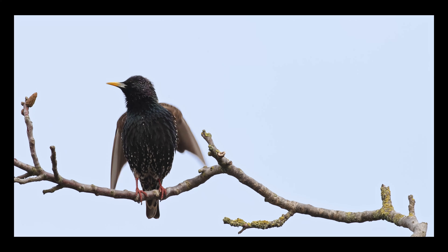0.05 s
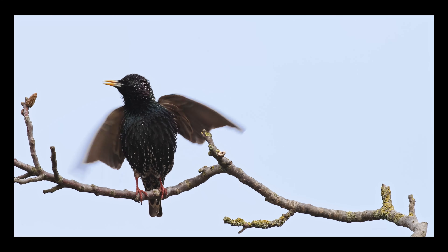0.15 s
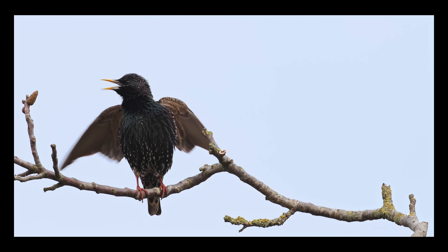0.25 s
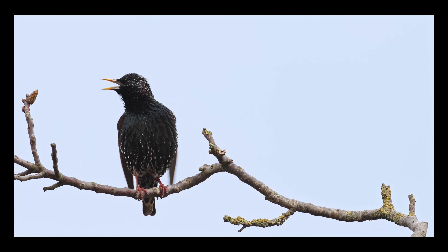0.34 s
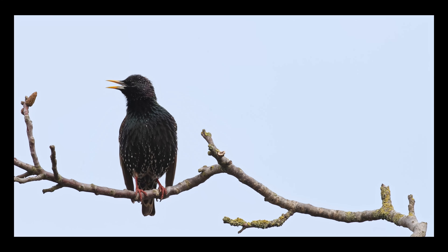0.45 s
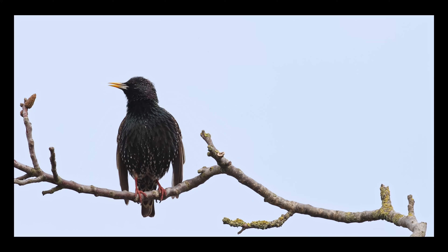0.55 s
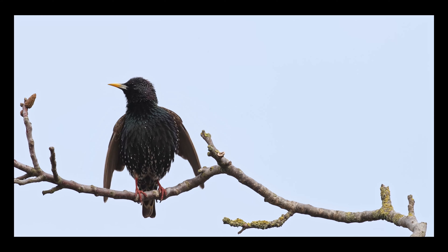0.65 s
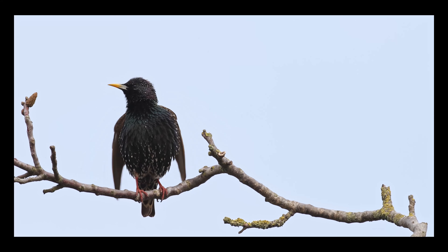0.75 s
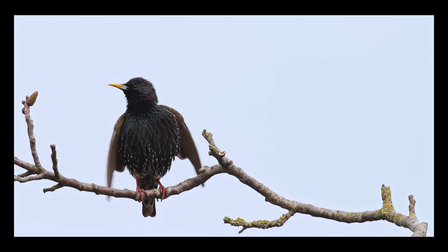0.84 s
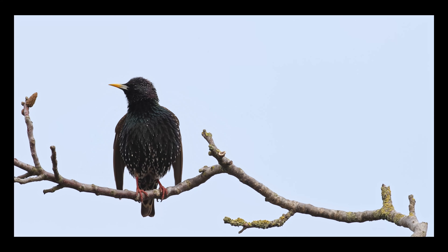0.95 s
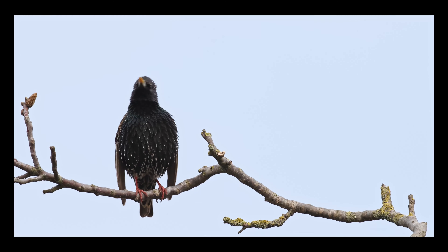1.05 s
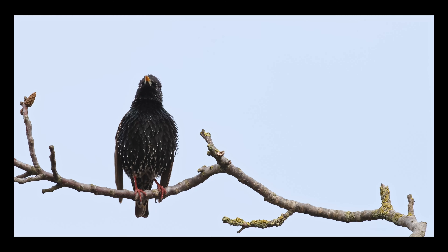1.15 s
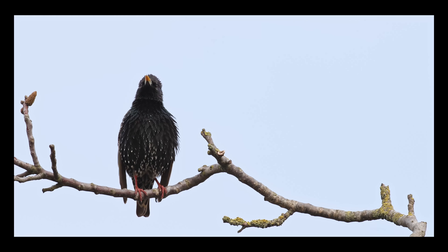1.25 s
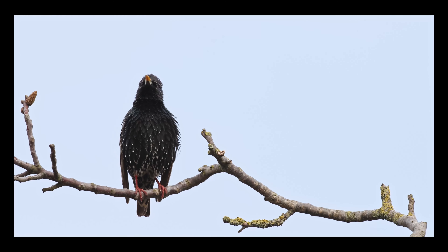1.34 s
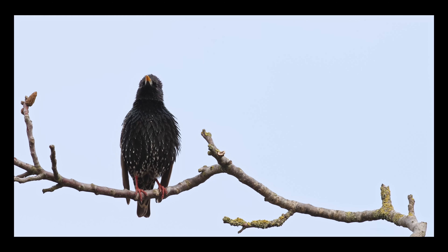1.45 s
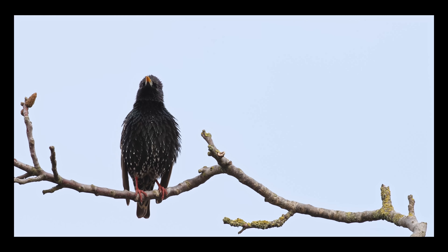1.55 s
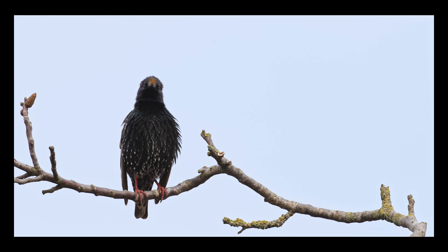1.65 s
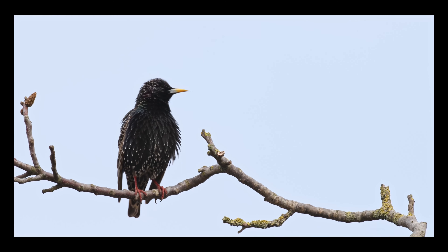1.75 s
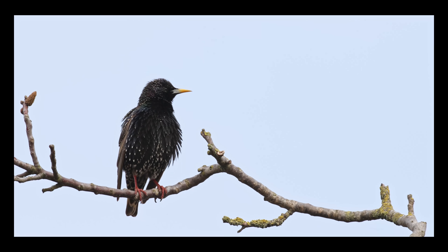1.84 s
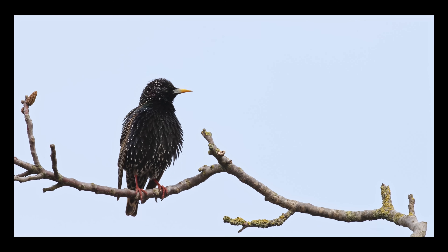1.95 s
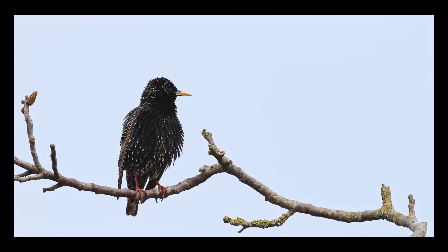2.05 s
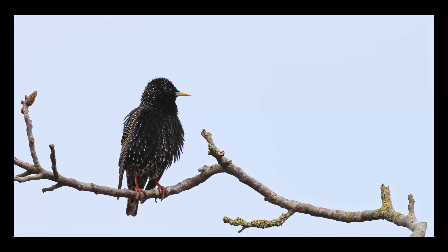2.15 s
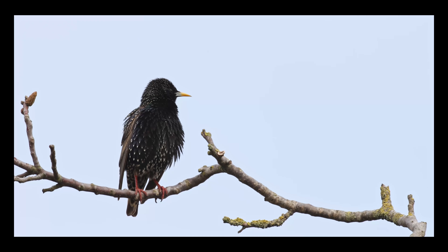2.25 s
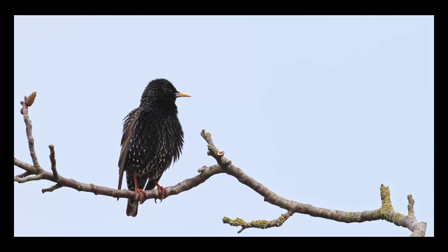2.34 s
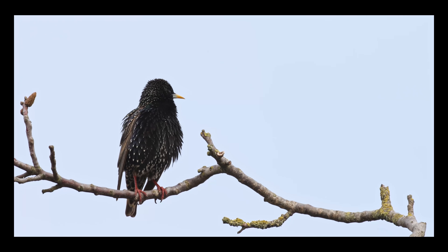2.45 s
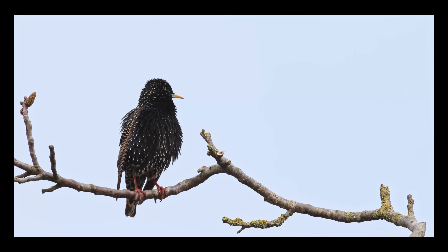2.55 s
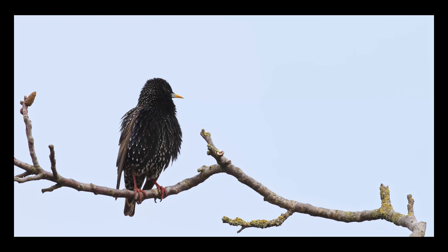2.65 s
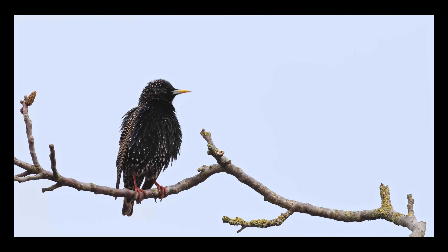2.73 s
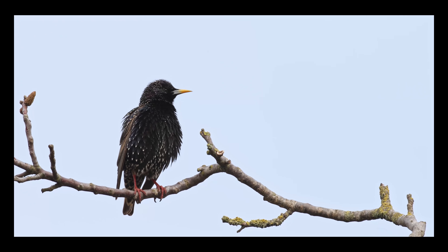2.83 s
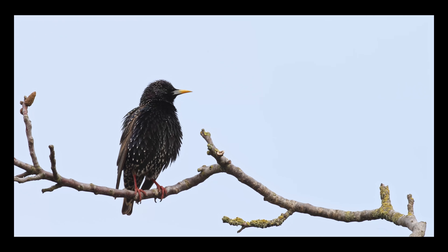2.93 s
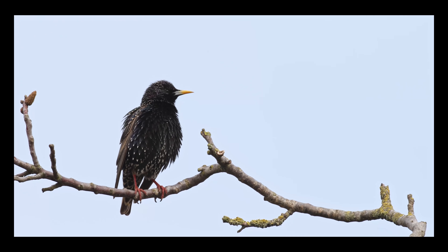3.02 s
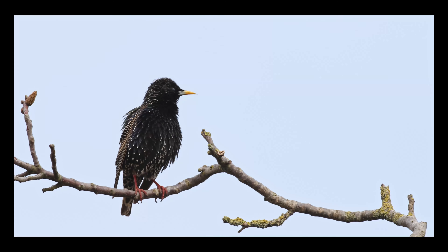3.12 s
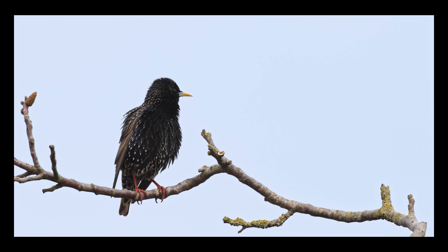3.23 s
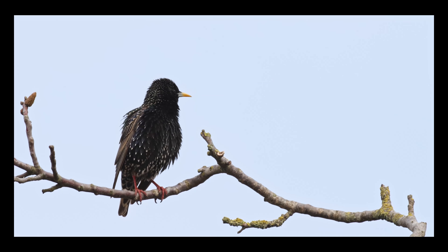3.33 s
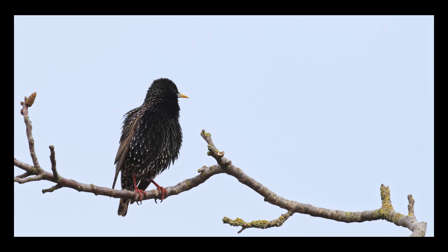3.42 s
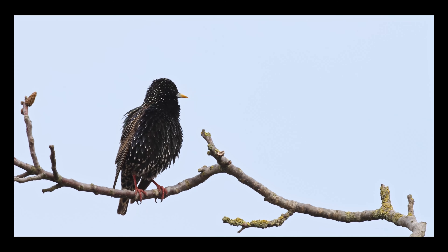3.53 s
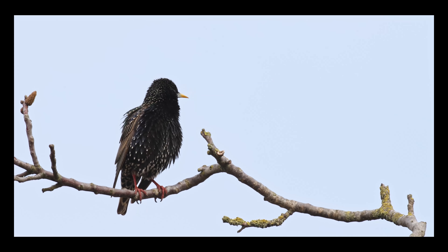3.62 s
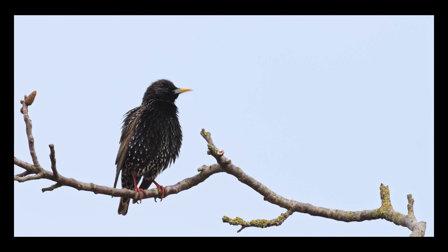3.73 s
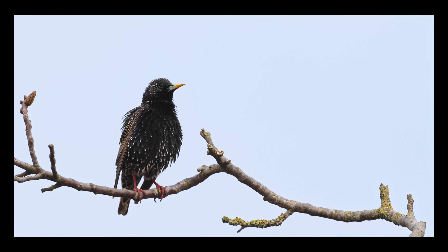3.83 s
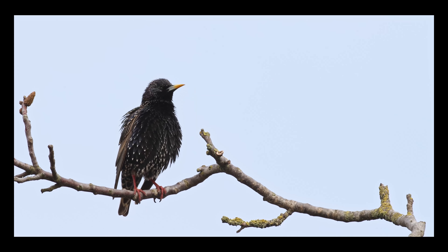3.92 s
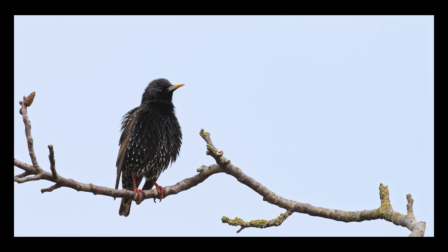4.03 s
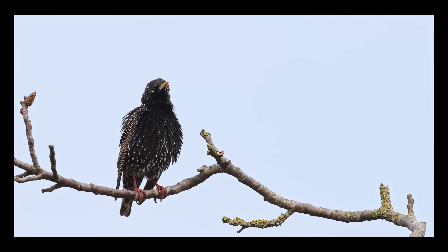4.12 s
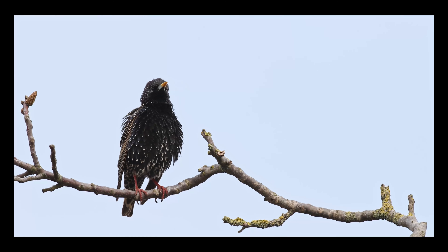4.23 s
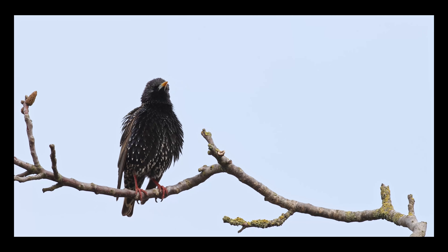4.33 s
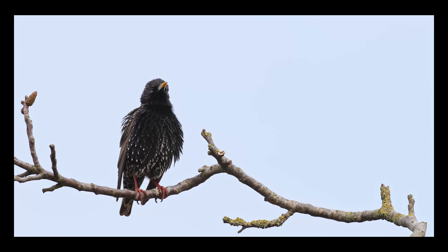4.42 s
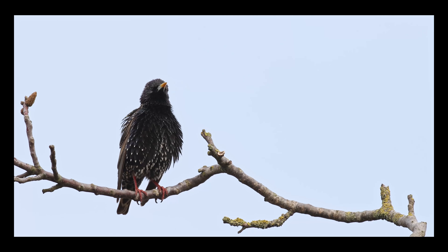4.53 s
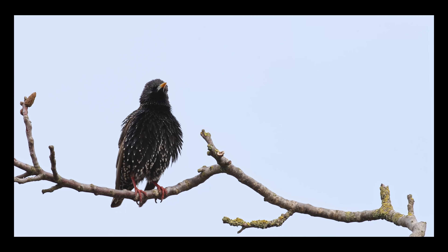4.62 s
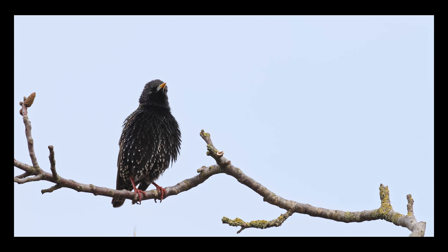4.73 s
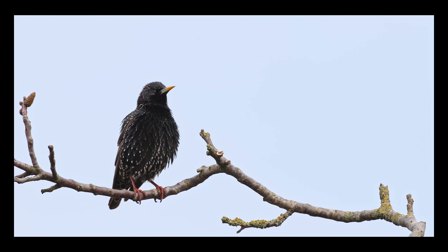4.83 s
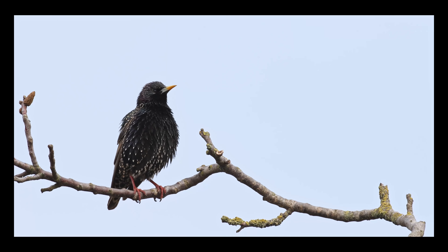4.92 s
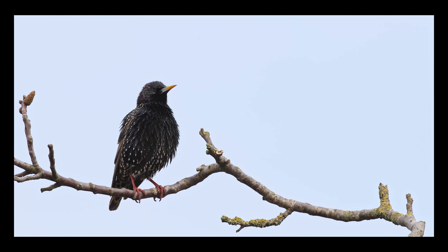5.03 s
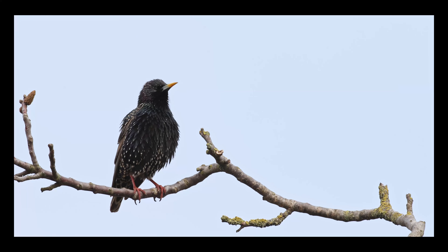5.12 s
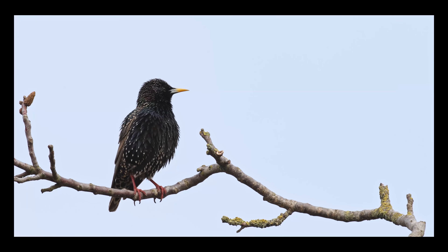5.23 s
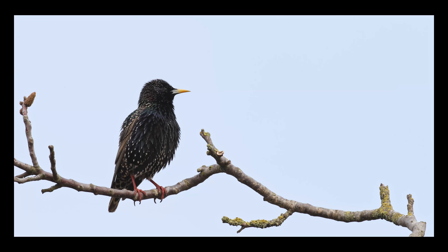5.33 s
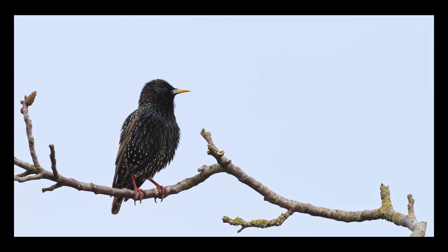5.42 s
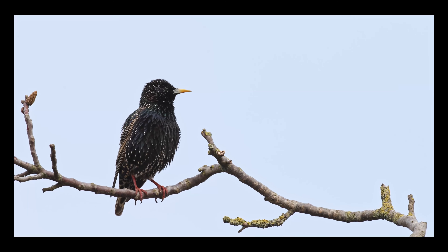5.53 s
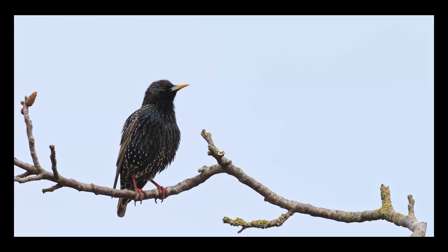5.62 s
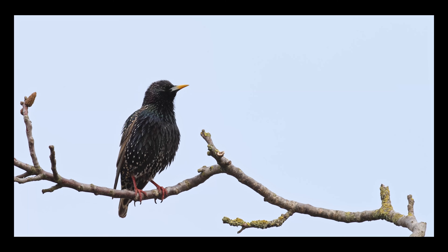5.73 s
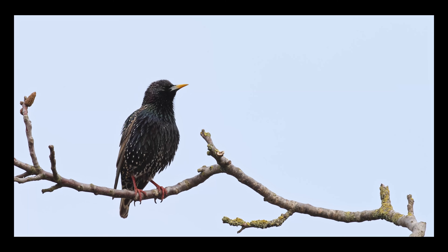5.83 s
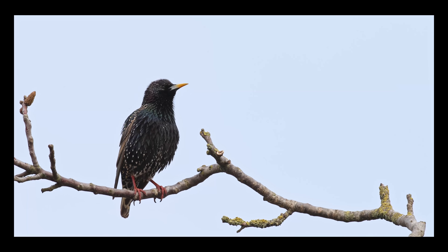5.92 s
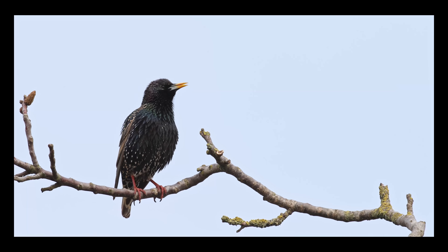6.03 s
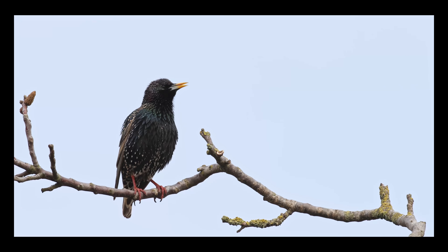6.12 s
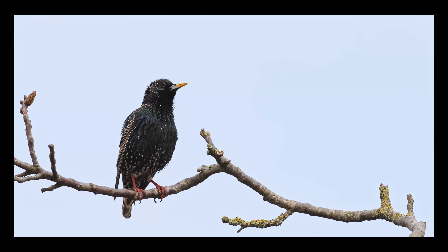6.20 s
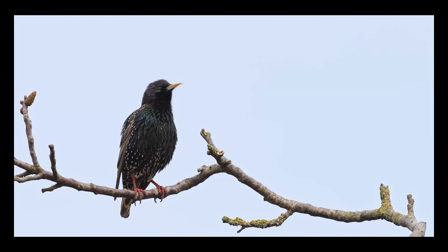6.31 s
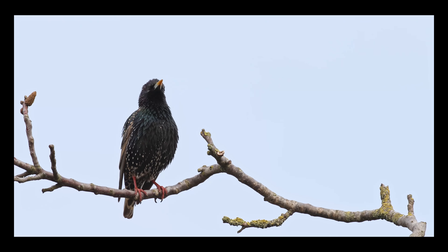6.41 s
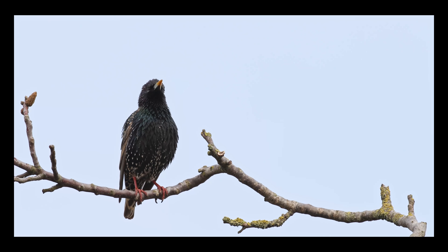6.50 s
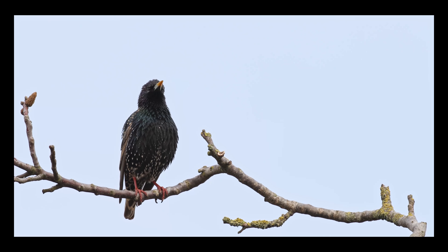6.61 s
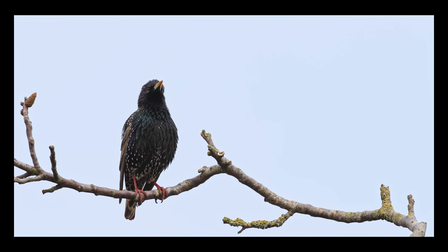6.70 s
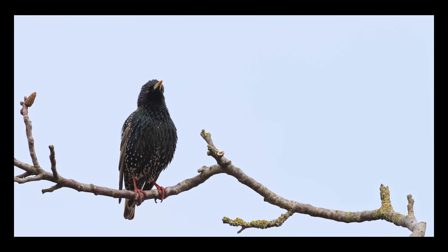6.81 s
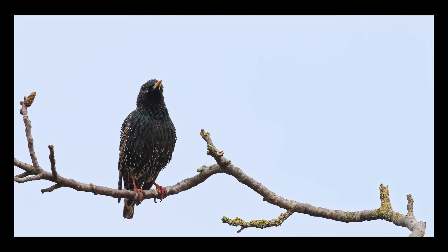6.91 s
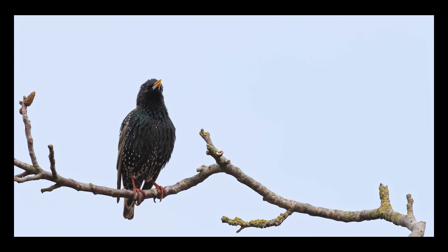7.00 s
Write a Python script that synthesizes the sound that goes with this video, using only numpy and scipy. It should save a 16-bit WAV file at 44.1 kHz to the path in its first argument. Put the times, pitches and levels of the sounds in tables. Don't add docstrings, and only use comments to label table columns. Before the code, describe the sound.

A starling close by on a bare branch opens with a quick rattle and buzz, then repeats shrill, rapidly fluttering high notes with short falling glides between them, weakening by three seconds. A few dry knocks tick near the microphone. Afterwards farther songbirds whistle and chip with a soft outdoor echo, while a thin whistle slides down. Low town rumble, light hiss and a wind puff lie underneath.

```python
import sys
import numpy as np
from scipy import signal
from scipy.fft import rfft, irfft, next_fast_len
from scipy.io import wavfile
from scipy.ndimage import uniform_filter1d, map_coordinates

SR = 44100
rng = np.random.default_rng(int(sys.argv[2]) if len(sys.argv) > 2 else 0)


def generate_wav(signal):
    frames = np.transpose(np.atleast_2d(signal))
    scaled = np.clip(frames, -1, 1) * 32767
    pcm = np.round(scaled).astype(np.int16)
    wavfile.write(sys.argv[1], SR, pcm)


def gain_from_decibels(decibels):
    exponent = np.asarray(decibels, float) / 20
    return 10 ** exponent


N = 311346
TIME = np.arange(N) / SR


def unit(x):
    return x / np.sqrt(np.mean(x ** 2) + 1e-20)


def along(points, hz):
    f, v = np.transpose(points)
    return np.interp(np.log(hz + 1), np.log(f + 1), v)


def wobble(t, rate):
    return map_coordinates(rng.standard_normal(int(rate) + 8), [(t - t[0]) * rate], mode="wrap")


def filtered(x, response):
    m = next_fast_len(N + SR // 2)
    return irfft(rfft(x, m) * response(np.fft.rfftfreq(m, 1 / SR)), m)[..., :N]


def span(rows):
    s, *cols = np.transpose(rows)
    t = TIME[round(s[0] * SR):round(s[-1] * SR)]
    return t, [uniform_filter1d(np.interp(t, s, c), size=150, mode="nearest") for c in cols]


def add(out, t, hz, db, overtones_db, unsteady_db=5.5, rate=90):
    phase = 2 * np.pi * np.cumsum(hz) / SR
    tone = np.sin(phase)
    for k, over_db in enumerate(overtones_db):
        tone = tone + gain_from_decibels(over_db) * np.sin((k + 2) * phase)
    edge = np.clip(np.minimum(t - t[0], t[-1] - t) / 0.00078, 0, 1)
    strength = np.sqrt(2) * gain_from_decibels(db + unsteady_db * np.clip(wobble(t, rate), -3, 1.3))
    out[round(t[0] * SR):][:len(t)] += strength * edge * tone


def dips(first_s, last_s, depth_hz):
    gap_s, last_early_s = 0.0285, 0.008
    opening_shares, closing_shares = (0.247, 0.653), (0.467, 0.63)
    count = round((last_s + last_early_s - first_s) / gap_s) + 1
    times = np.minimum(np.linspace(first_s, last_s + last_early_s, count), last_s)
    depths = depth_hz * np.r_[opening_shares, np.ones(count - 4), closing_shares]
    return zip(times, depths, np.arange(count)[::-1] % 2 == 0)


def crest_line(hook, warble):
    s, hook_db, low_hz, low_db, rise_s = hook
    _, last_s, top_hz, db, _ = warble
    hook_hz, lowest_s, swell_s = 1910, 0.042, 0.042
    late_db, climb_hz_per_s = 0.5, 2000
    t, (over_hz, db) = span([
        (s, hook_hz * 0.874, hook_db - 9),
        (s + 0.0056, hook_hz * 0.88, hook_db),
        (s + 0.013, hook_hz, hook_db),
        (s + 0.027, hook_hz * (1 - 0.9), (hook_db + low_db) / 2),
        (s + lowest_s, 0, low_db),
        (s + lowest_s + swell_s, 0, db),
        (last_s - 0.04, 0, db + late_db),
        (last_s + 0.0094, 0, db - late_db),
        (last_s + 0.0315, -150, db - 9)])
    risen = 1 - np.exp(-(np.clip(t - s - lowest_s, 0, 1) / rise_s) ** 1.9)
    crest_hz = top_hz - climb_hz_per_s * np.clip(last_s - t, 0, 1)
    return t, low_hz + over_hz + (crest_hz - low_hz) * risen, db


def high_notes():
    # start t/s, hook level/dB, lowest f/Hz, level there/dB, rise time/s
    hooks = [
        (.224, -41, 6820, -40.5, .06),
        (.946, -41, 6850, -39.5, .045),
        (1.62, -43.5, 6700, -58, .055),
        (1.953, -54, 5600, -62, .075),
        (2.642, -52, 6670, -56, .045),
    ]
    # first dip t/s, last dip t/s, top f/Hz, level/dB, dip depth f/Hz
    warbles = [
        (0.309, 0.548, 8000, -39.5, 870),
        (1.003, 1.212, 8050, -38.5, 830),
        (1.705, 1.84, 8330, -47.5, 695),
        (2.096, 2.265, 8300, -48, 495),
        (2.7, 2.863, 8030, -52, 808),
    ]
    flutter_hz = 190
    out = np.zeros(N)
    drops = [drop for first_s, last_s, _, _, depth_hz in warbles for drop in dips(first_s, last_s, depth_hz)]
    for hook, warble in zip(hooks, warbles):
        t, hz, db = crest_line(hook, warble)
        dip, flutter, overshoot = np.zeros(len(t)), np.zeros(len(t), complex), np.zeros(len(t))
        for s, depth, strong in drops:
            shape = depth * np.exp(-abs((t - s) / 0.0085) ** 4)
            dip = dip + shape
            flutter = flutter + shape * np.exp(2j * np.pi * flutter_hz * (t - s - 0.001))
            overshoot = overshoot + strong * depth * np.exp(-((t - s - 0.012) / 0.00395) ** 2)
        hz = hz - 0.85 * dip + 0.3 * flutter.imag - 0.1 * flutter.real + 0.33 * overshoot
        hz = hz + (45 + 0.12 * dip) * wobble(t, 200)
        pulses_db = 20 * np.log10(np.clip(1 + flutter.real / 1100, 0.1, 2))
        add(out, t, hz, db + 3.0 * dip / 1000 + pulses_db, [-26], unsteady_db=2.5, rate=150)
    return out


def rattles():
    # t/s, length/s, from f/Hz, to f/Hz, level/dB
    kinds = [
        ((69.5, 520, -46, 0.5, 11.5), [(.125, 0.14, 2440, 3320, -47.5), (.235, 0.05, 3100, 2550, -53.5)]),
        ((120, 330, -9.5, .4, 25), [(.303, .13, 5615, 5115, -37.5)]),
        ((63.5, 457, -17, 0.68, 3), [(0, 0.057, 2720, 2610, -66), (.71, 0.11, 3400, 2540, -63.5), (1.275, .225, 2530, 2810, -60), (2.41, 0.095, 3090, 2480, -71.5)]),
        ((75.5, 903, -30, 1, 4), [(0, 0.048, 5070, 5000, -65.5), (.715, 0.062, 3700, 5220, -64), (1.39, 0.061, 4450, 4630, -64.5), (1.62, 0.021, 4540, 4300, -68), (2.42, 0.076, 4270, 4720, -71), (5.18, 0.042, 3200, 2980, -67)]),
        ((52.5, 196, -15, 1.31, 6), [(5.17, 0.0525, 1800, 1550, -58), (4.58, 0.061, 2060, 2120, -64.5), (5.6, .06, 1900, 2050, -66), (5.43, 0.073, 2005, 2230, -66), (5.5, 0.033, 2280, 3270, -70), (6.88, 0.095, 4150, 3670, -68.5), (7.005, 0.093, 7820, 7600, -67.5)]),
    ]
    out = np.zeros(N)
    for (rate, swing_hz, over_db, rough, ends_db), rows in kinds:
        for s, length, from_hz, to_hz, db in rows:
            t, (hz, arch) = span([(s, from_hz, -1), (s + length, to_hz, 1)])
            for lag, side_db in [(0.45, -1.6), (0.9, 13 * rough - 12)]:
                turn = 2 * np.pi * (rate * (t - s) - lag) + 1.51 * rough * wobble(t, 45.55)
                place = np.cos(turn) - 0.25 * np.sin(2 * turn) + rough * wobble(t, 330)
                throat_db = -2.5 * np.sin(turn) - 3 * (place - 0.2) ** 2
                level_db = db - ends_db * arch ** 2 + side_db + throat_db
                add(out, t, hz + swing_hz * place, level_db, [over_db], unsteady_db=3.2, rate=250)
    return out


def glides_and_squeaks():
    # t/s, length/s, from f/Hz, to f/Hz, level/dB
    glides = [
        (0.259, 0.014, 1950, 1820, -54),
        (0.158, .045, 4500, 3630, -66),
        (0.838, 0.073, 6000, 4170, -72.5),
        (0.896, .038, 4300, 3270, -61.5),
        (0.909, .035, 3050, 2220, -67),
        (1.516, 0.047, 5600, 4460, -70),
        (1.553, .045, 4700, 3460, -60.5),
        (1.597, 0.018, 5600, 4700, -67),
        (2.547, 0.025, 5600, 5200, -67),
        (2.587, .033, 4600, 3900, -70.5),
    ]
    # t/s, length/s, level/dB
    clucks = [
        (1.611, 0.048, -70),
        (3.019, 0.028, -68.5),
        (6.498, .05, -73),
    ]
    # t/s, top f/Hz, level/dB
    squeaks = [
        ((.022, 0.18, -30), [(.545, 5570, -63), (1.212, 5830, -60), (1.833, 5870, -60.5), (2.25, 5870, -64), (2.862, 4900, -80)]),
        ((.044, 0.156, 9), [(6.088, 1250, -64), (6.215, 1217, -67)]),
    ]
    out = np.zeros(N)
    falls = [(*row, -17) for row in glides] + [(s, length, 1050, 750, db, 14) for s, length, db in clucks]
    for s, length, from_hz, to_hz, db, over_db in falls:
        t, (hz, fade_db) = span([(s, from_hz, db), (s + length, to_hz, db - 3)])
        add(out, t, hz, fade_db, [over_db, over_db - 9.5], unsteady_db=4.0)
    for (length, droop, over_db), rows in squeaks:
        overtones_db = [over_db, over_db + 3, over_db - 11, over_db - 13]
        for s, top_hz, db in rows:
            t, (arch,) = span([(s, -1), (s + length, 1)])
            add(out, t, top_hz * (1 - droop * abs(arch) ** 4), db, overtones_db, unsteady_db=2)
    return out


def whistle():
    # t/s, f/Hz, level/dB
    line = [
        (5.3, 4320, -77),
        (5.5, 4090, -72),
        (5.6, 3830, -69),
        (5.66, 3590, -58),
        (5.85, 3380, -60),
        (5.92, 2990, -53.5),
        (6, 2876, -55),
        (6.07, 2540, -63),
    ]
    out = np.zeros(N)
    t, (hz, db) = span(line)
    add(out, t, hz + 25 * wobble(t, 45.1), db, [], unsteady_db=3.5, rate=40.4)
    return out


def far_birds():
    # t/s, length/s, from f/Hz, to f/Hz, level/dB
    plain = [(3.38, 0.07, 5400, 5400, -72), (3.398, 0.027, 3480, 3500, -69),
             (3.651, 0.24, 3800, 3950, -71.5), (4.25, 0.054, 3960, 3600, -66.5),
             (4.402, 0.16, 5700, 5750, -62.5), (4.58, .15, 5800, 5750, -75), (4.2, 0.021, 4900, 3750, -65),
             (4.466, 0.053, 3650, 3300, -63.5), (4.688, 0.16, 7380, 7700, -67),
             (4.82, .13, 4930, 4520, -55.5), (4.972, 0.34, 5570, 5850, -62.5),
             (4.6, 0.043, 4100, 4000, -72), (4.759, 0.11, 3860, 3920, -73), (4.28, 0.302, 1560, 1350, -71),
             (5.762, .075, 5650, 4600, -66), (5.835, .075, 4950, 4480, -49), (5.9, .05, 4500, 4250, -64),
             (6.677, 0.11, 4900, 4740, -60), (6.74, 0.146, 3020, 2980, -75), (5.92, .11, 2060, 2000, -70),
             (6.3, 0.37, 553, 540, -68), (5.53, .07, 3750, 3400, -66), (6.66, .035, 5900, 4900, -53),
             (3.99, 0.041, 4560, 4520, -67),
        (4.052, .03, 4780, 4440, -65),
        (4.107, 0.027, 4650, 4350, -62),
        (4.158, .04, 4780, 4300, -68),
        (4.22, .03, 4600, 4480, -74),
        (4.35, 0.029, 4700, 4460, -66),
    ]
    # fall start t/s, held/s, f/Hz, fall f/Hz, level/dB
    hooked = [
        (5.2, .12, 4465, 940, -59.5),
        (5.364, 0.092, 6870, 1040, -51.5),
        (5.545, 0.071, 6760, 1000, -51),
        (5.724, 0.068, 6630, 930, -55.5),
        (6.64, .065, 5950, 940, -59),
    ]
    ends_db, peak_at, fall_s = 7.5, 0.5, 0.042
    out, lines = np.zeros(N), []
    for s, length, a, b, db in plain:
        lines.append([(s, a, db - ends_db),
                      (s + peak_at * length, a + peak_at * (b - a), db),
                      (s + length, b, db - ends_db)])
    for s, held, hz, fall, db in hooked:
        lines.append([(s - held, hz, db - 17), (s - 0.03, hz, db), (s, hz, db),
                      (s + fall_s / 2, hz - 0.6 * fall, db), (s + fall_s, hz - fall, db - 7.5)])
    for rows in lines:
        t, (hz, db) = span(rows)
        hz = hz * (1 + 0.009 * wobble(t, 110))
        add(out, t, hz, db - 2 + 1.5 * wobble(t, 22), [], unsteady_db=3.5, rate=90)
    return out + 0.6 * np.roll(out, 410)


def chips():
    # t/s, length/s, from f/Hz, to f/Hz, level/dB
    single = [
        (3.704, 0.017, 4890, 4170, -70.5),
        (3.785, .011, 3900, 3570, -68),
        (5.42, .019, 5990, 5280, -64),
        (5.6, .02, 6070, 5170, -63.5),
        (6.068, .012, 4000, 2910, -64),
    ]
    # t/s, level/dB
    trill = [
        (6.011, -56.5),
        (6.102, -54.5),
        (6.19, -55.5),
        (6.277, -58),
        (6.368, -55.5),
        (6.459, -54),
        (6.551, -56),
    ]
    out = np.zeros(N)
    for s, length, from_hz, to_hz, db in single + [(s, 0.021, 5250, 3900, db) for s, db in trill]:
        t, (left,) = span([(s, 1), (s + length, 0)])
        hz = to_hz + (from_hz - to_hz) * left ** 1.7 + 160 * wobble(t, 300)
        add(out, t, hz, db - 2.5 + 1.5 * left, [], unsteady_db=2.5, rate=250)
    return out + 0.7 * np.roll(out, 330) + 0.4 * np.roll(out, 170)


def knocks():
    # t/s, peak level/dB, thump level/dB
    ticks = [
        (3.478, -25, -4.5),
        (3.4861, -31, -10),
        (3.6366, -35.5, -8),
        (3.653, -46, 6),
    ]
    # f/Hz, width f/Hz, level/dB
    modes = [
        (318, 140, 4.5),
        (1660, 400, 12),
        (3200, 1600, 1),
        (7000, 3900, -5),
    ]
    blows, t = np.zeros(N), np.arange(600) / SR
    for s, db, thump_db in ticks:
        chatter = rng.standard_normal(len(t)) * gain_from_decibels(-60 * t / 0.013)
        thump = gain_from_decibels(thump_db) * 5 * uniform_filter1d(chatter, size=40)
        blows[round(s * SR):][:len(t)] += gain_from_decibels(db - 7) * (chatter + thump)

    def ring(f):
        return sum((-1) ** k * gain_from_decibels(db) * 1j * f * w / (c * c - f * f + 1j * f * w)
                   for k, (c, w, db) in enumerate(modes))
    return filtered(blows, ring)


def trees(x, gap_s):
    # f/Hz, t60/s
    decay = [(1000, 0.52), (5000, 1.28), (8000, 0.7), (12000, 0.25)]
    out, step = np.zeros(N + 2 * SR), SR // 5
    for a in range(0, N, step):
        hz, t, z = signal.stft(rng.standard_normal(SR * 3 // 4), SR, nperseg=256)
        walls_db = 7 / (1 + (t / 0.18) ** 8) + 4 * np.exp(-((t - 0.085) / 0.0014) ** 2)
        decay_db = -60 * t / along(decay, hz)[:, None]
        tail = signal.istft(z * gain_from_decibels(walls_db + decay_db), SR, nperseg=256)[1]
        wet = signal.fftconvolve(x[a:a + step], unit(tail) / np.sqrt(len(tail)))
        out[a + round(gap_s * SR):][:len(wet)] += wet
    return out[:N]


def rush(spectrum):
    # f/Hz, side over mid level/dB
    width = [(60, -40), (110, -32), (200, -37), (380, -27), (700, -26.5), (1290, -17), (2380, -8),
             (4400, -9), (8120, 0), (15000, -1.5)]

    def shape(hz):
        return gain_from_decibels(along(spectrum, hz)) * np.array([hz ** 0, gain_from_decibels(along(width, hz))])
    mid, side = filtered(rng.standard_normal((2, N)), shape)
    return np.array([mid + side, mid - side]) / np.std(mid)


def background():
    # f/Hz, level/dB per Hz
    rumble = [(59, -14), (100, -17), (116, -2), (129, -0.5), (172, -2), (215, 0), (242, -5), (274, 0),
              (295, -6), (312, -7), (453, -22), (489, -61), (520, -23.5), (680, -30.5), (1140, -120)]
    buffet = [(12, -61), (20, -6), (36, -5.5), (54, 5.5), (70, 2), (86, -8), (92, -9.5), (120, 0.5),
              (160, -40), (260, -120)]
    far_air = [(260, -20), (450, 0), (505, -2), (772, 1), (850, -1.5), (963, -11), (1180, -7), (1340, -5),
               (1980, -6.5), (2340, -10), (2970, -11.5), (4500, -20), (5850, -62), (9900, -120)]
    preamp = [(2650, -49), (4500, -11), (6870, -3), (9070, -2), (14600, -0.5), (15700, -4.5)]
    # t/s, peak level/dB, dying time/s
    gusts = [
        (1.1, -60.5, 0.065),
        (2.54, -60, 0.099),
        (6.53, -41, 0.1),
        (6.96, -55.5, 0.088),
    ]
    drift_db = -0.17 * (TIME - 2)
    town = (gain_from_decibels(-50.5 + drift_db) + gain_from_decibels(-44) * np.exp(-TIME / 0.28)) * rush(rumble)
    puffs = np.zeros(N)
    for s, db, dying_s in gusts:
        rise = np.exp(-((TIME - s) / 0.064) ** 2)
        fall = np.exp(-np.clip(TIME - s - 0.04, 0, 9) / dying_s)
        puffs += gain_from_decibels(db) * np.where(TIME < s, rise, fall)
    wind = (gain_from_decibels(-58 + 2.3 * wobble(TIME, 3)) + puffs) * rush(buffet)
    air = (gain_from_decibels(-64) + gain_from_decibels(-64.5) * np.exp(-TIME / 0.34)) * rush(far_air)
    return town + wind + air + gain_from_decibels(-62.5) * rush(preamp)


def scene():
    starling = high_notes() + rattles() + glides_and_squeaks()
    soft, far, farthest, case = whistle(), far_birds(), chips(), knocks()
    near = gain_from_decibels(-12.5) * starling + gain_from_decibels(-14) * (soft + case)
    echo = trees(near + gain_from_decibels(-7.5) * far + gain_from_decibels(-4) * farthest, gap_s=0.006)
    return starling + soft + far + farthest + case + echo + background()


def roll_off(x):
    return signal.sosfilt(signal.butter(12, 15860, fs=SR, output="sos"), x)


def record(dry):
    top_hz = 15790
    mix = filtered(dry, lambda hz: hz < top_hz)
    return roll_off(mix)


dry = scene()
out = record(dry)
generate_wav(out)
```